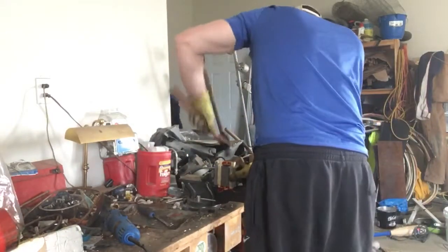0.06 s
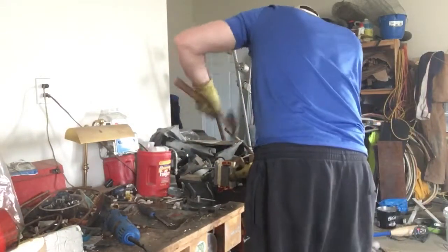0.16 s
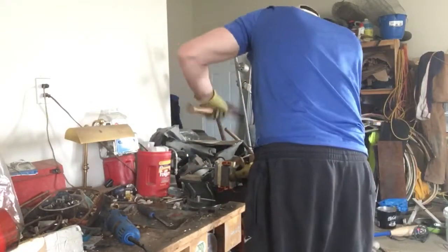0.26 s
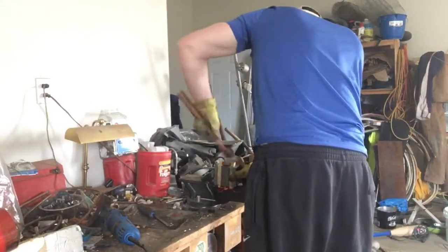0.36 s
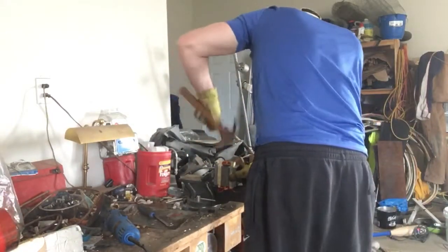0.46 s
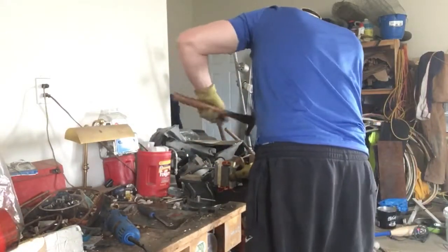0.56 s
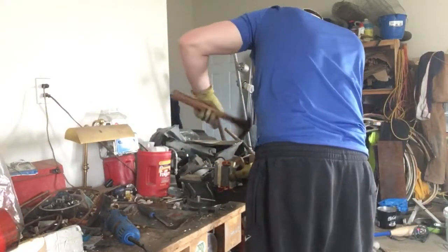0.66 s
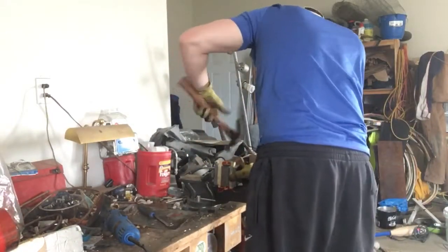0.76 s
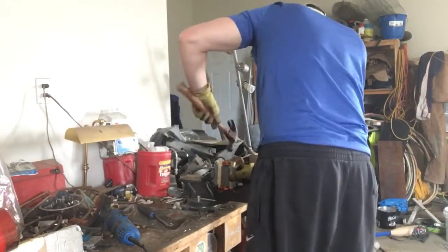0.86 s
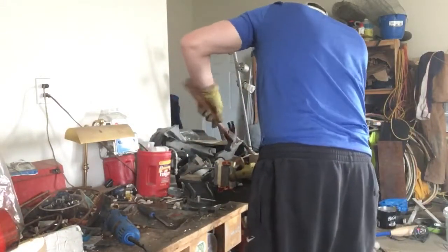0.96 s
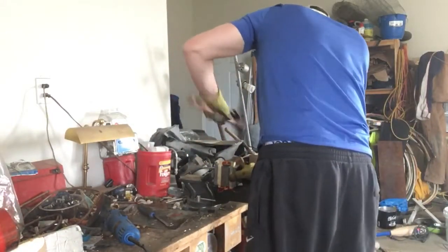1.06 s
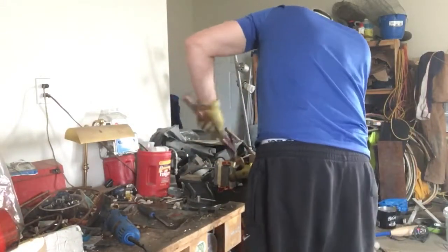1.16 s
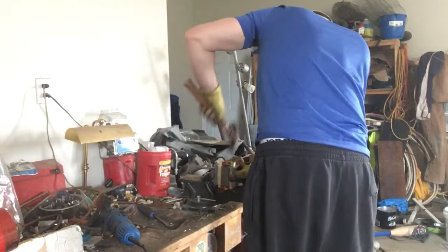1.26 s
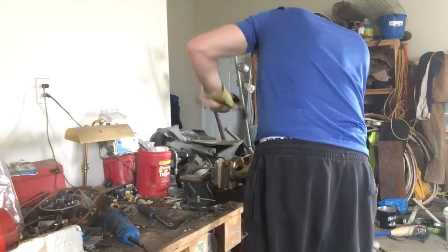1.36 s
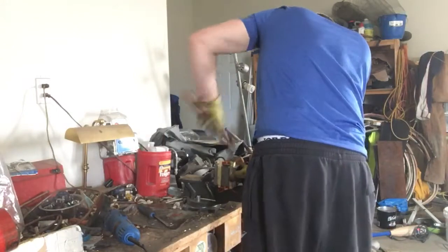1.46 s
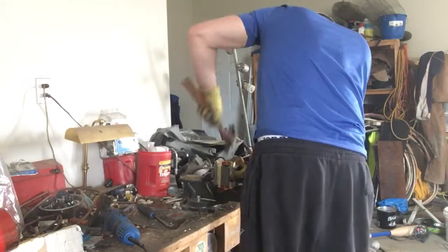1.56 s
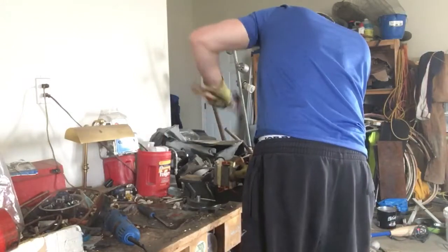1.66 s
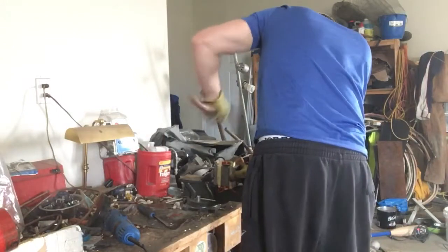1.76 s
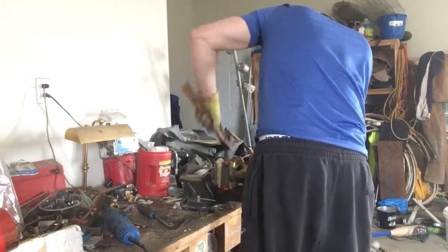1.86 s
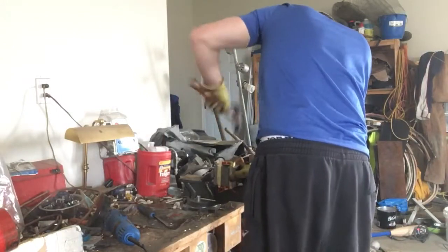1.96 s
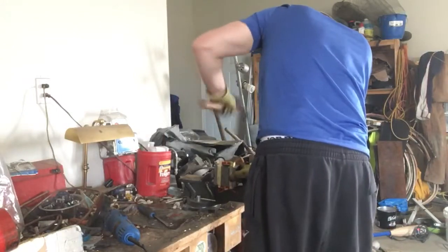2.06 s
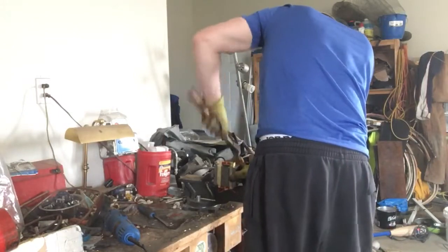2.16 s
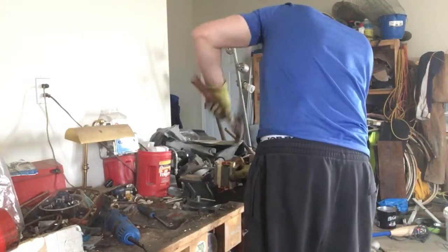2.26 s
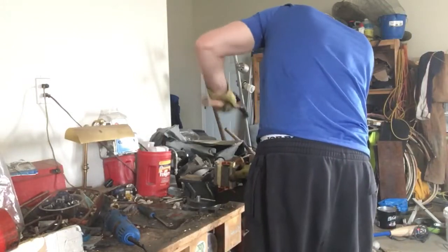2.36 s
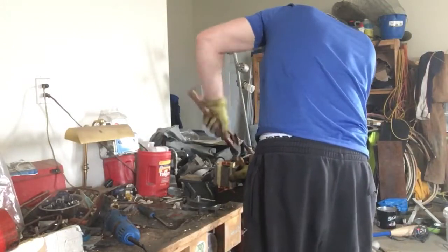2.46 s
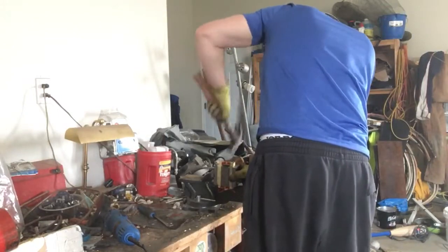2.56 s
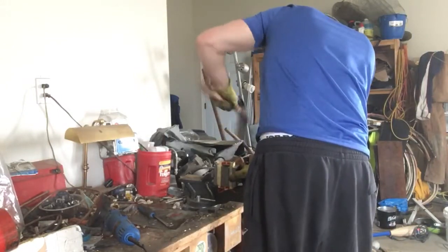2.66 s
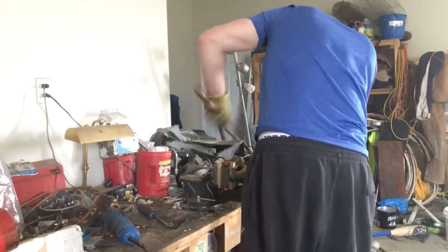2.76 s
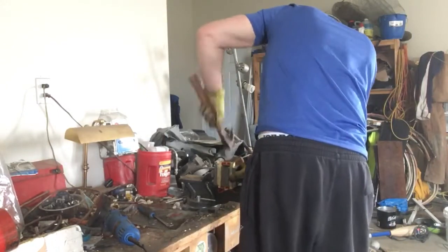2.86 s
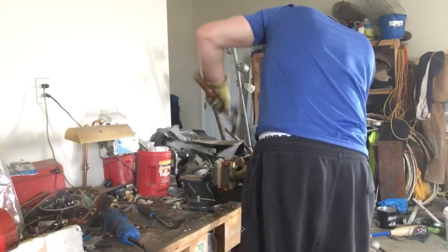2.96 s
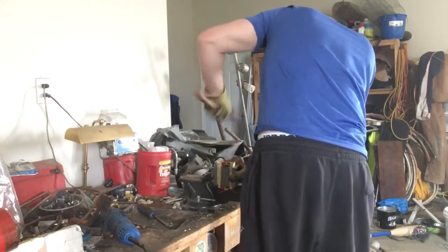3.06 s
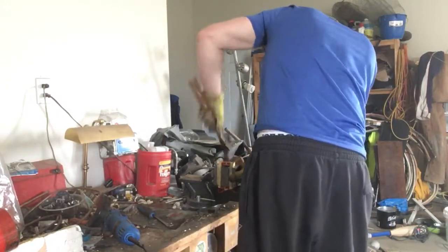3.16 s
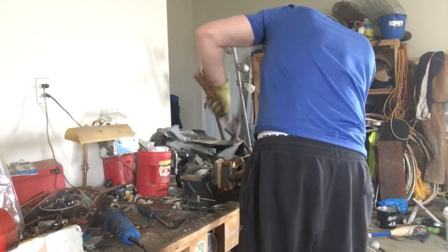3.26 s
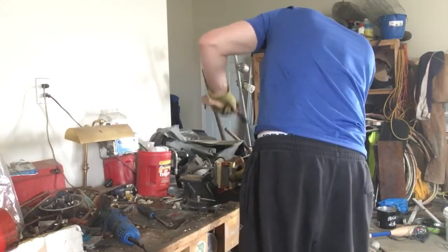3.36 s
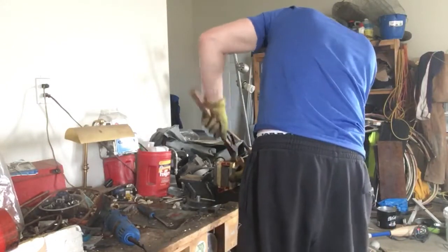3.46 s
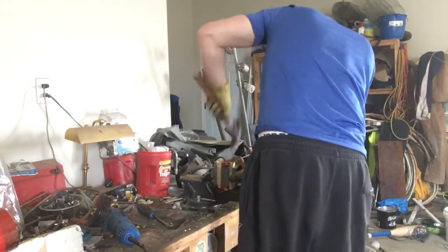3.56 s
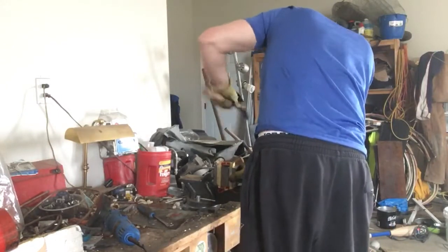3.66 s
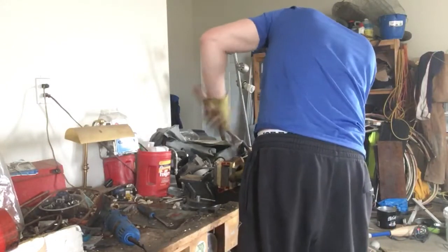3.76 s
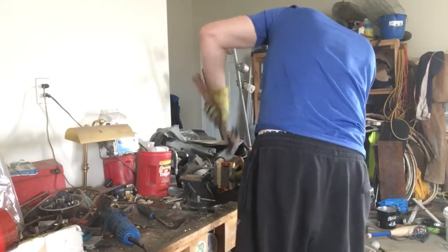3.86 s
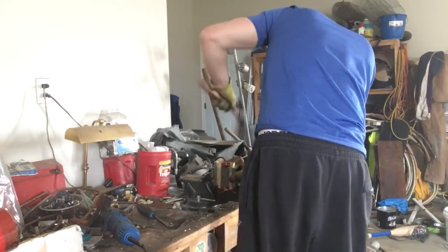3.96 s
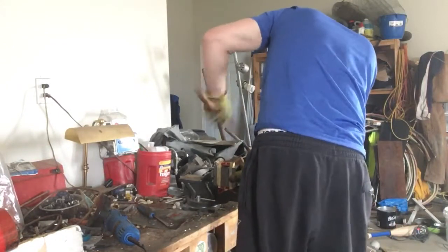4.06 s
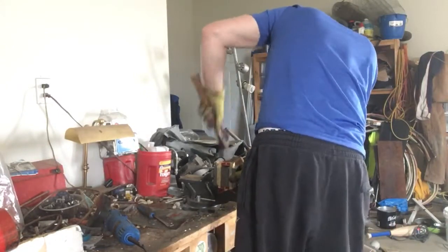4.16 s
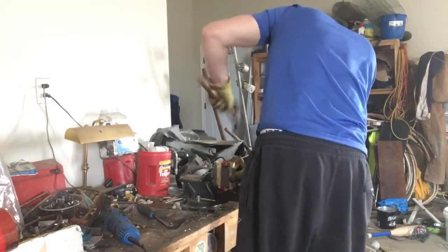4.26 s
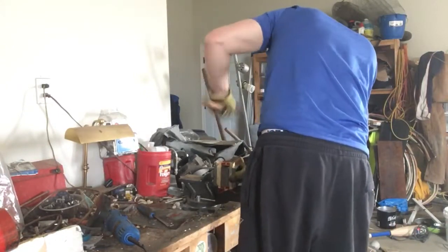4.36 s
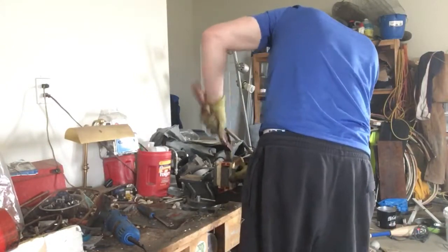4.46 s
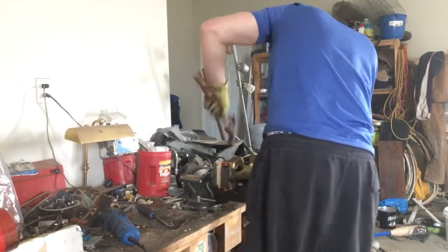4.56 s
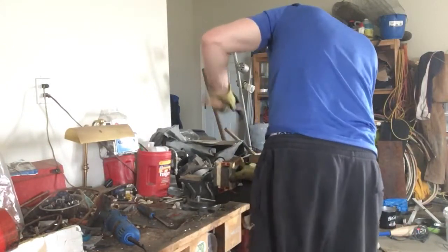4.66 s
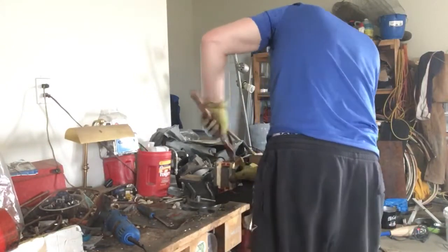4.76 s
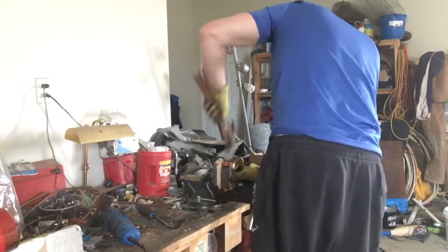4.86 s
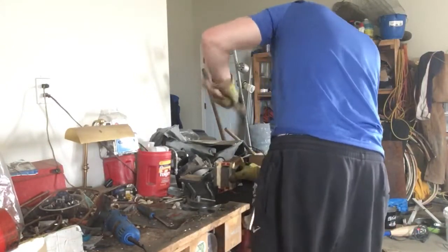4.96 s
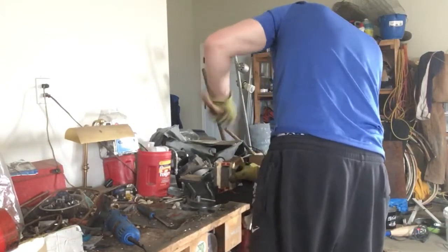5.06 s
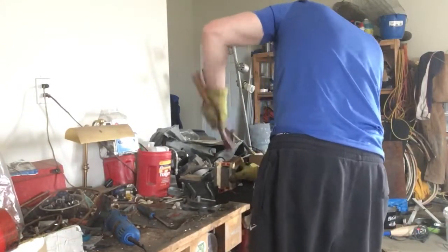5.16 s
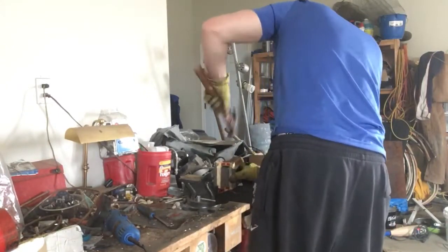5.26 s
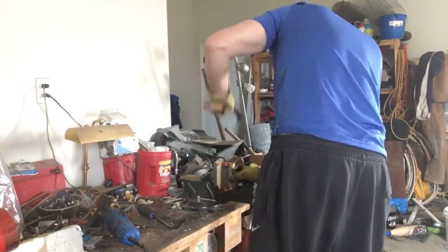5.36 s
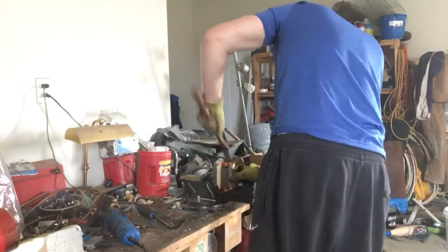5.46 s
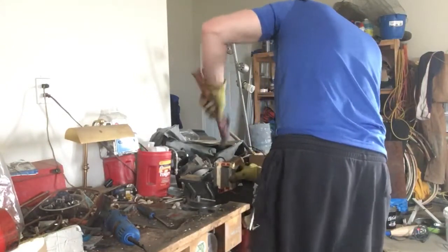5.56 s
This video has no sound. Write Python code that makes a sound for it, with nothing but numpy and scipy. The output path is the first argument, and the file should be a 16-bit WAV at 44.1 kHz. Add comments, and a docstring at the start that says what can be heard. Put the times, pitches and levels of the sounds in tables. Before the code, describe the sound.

Sharp, ringing hammer blows on clamped steel, two at first and then a steady run, with workbench thumps and garage echo.

```python
"""A hammer strikes a steel part in a bench vise, a few steps away in a hard-walled garage.
The scene opens in the echo of a blow, over faint hiss and rumble. Two blows follow, a pause in which
loose metal ticks, then steady hammering, three blows a second, with one more tick near the end.
Each blow clicks and cracks on contact, rings the hammer head and the part, thumps the wooden bench,
and dies away in about a second of echo."""
import sys
import numpy as np
from scipy import signal
from scipy.fft import rfft, irfft, next_fast_len
from scipy.io import wavfile
from scipy.ndimage import map_coordinates

SR = 44100
rng = np.random.default_rng(int(sys.argv[2]) if len(sys.argv) > 2 else 0)


def unload_audio(sound):
    """Save the sound as a 16-bit wav file, at the path given as the first command line argument."""
    columns = np.transpose(np.atleast_2d(sound))
    # keep every value between -1 and 1, then stretch to whole-number steps
    steps = np.round(np.clip(columns, -1, 1) * 32767)
    wavfile.write(sys.argv[1], SR, steps.astype(np.int16))


N = 246959
AGE_S = np.arange(SR * 3 // 2) / SR  # time since contact


def amp(db):
    """dB to gain."""
    return 10 ** (np.asarray(db) / 20)


def along(points, hz):
    """Curve through (f/Hz, value) points, log frequency axis."""
    f, v = np.transpose(points)
    return np.interp(np.log(hz + 1), np.log(f + 1), v)


def burst(spectrum, t60_curve, colour=((1000, 0),)):
    """Noise normalised in its spectrum, then coloured; each frequency decays at its own rate."""
    hz, t, bins = signal.stft(rng.standard_normal(len(AGE_S)), SR, nperseg=512, noverlap=384)
    gain = amp(along(spectrum, hz))
    gain = gain / np.sqrt(np.mean(gain ** 2)) * amp(along(colour, hz))
    decay = amp(-60 * t / along(t60_curve, hz)[:, None])
    return signal.istft(bins * gain[:, None] * decay, SR, nperseg=512, noverlap=384)[1][:len(AGE_S)]


def ring(modes, scatter_db, rise_s, colour=((1000, 0),)):
    """Damped sines of alternating polarity, levels coloured and randomly scattered."""
    hz, db, t60_s = np.transpose(modes)[:, :, None]
    db = db + along(colour, hz) + scatter_db * rng.standard_normal(hz.shape)
    polarity = (-1) ** np.arange(len(hz))[:, None]
    envelope = amp(db - 60 * AGE_S / t60_s) * (1 - np.exp(-AGE_S / rise_s))
    return (polarity * envelope * np.sin(2 * np.pi * hz * AGE_S)).sum(0)


# Idle garage spectrum: f/Hz, level/dB
IDLE_SPECTRUM = [(18, -21.5), (30, 6), (91, -5.5), (314, -10.5), (608, -22.5), (1660, -19.5), (4770, -28),
                 (14800, -34.5), (16500, -13)]

def idle_garage(rms_db=-61.5):
    """Steady hiss and rumble."""
    size = next_fast_len(N)
    gain = amp(along(IDLE_SPECTRUM, np.fft.rfftfreq(size, 1 / SR)))
    noise = irfft(rfft(rng.standard_normal(size)) * gain, size)[:N]
    return amp(rms_db) * noise / noise.std()


# Loose metal ticks: t/s, level/dB
TICKS = [(.9155, -56), (4.751, -58)]

def loose_metal(t60_s=0.004):
    """A bit of metal settles with tiny bright clicks."""
    out = np.zeros(N + len(AGE_S))
    for start_s, db in TICKS:
        bright_noise = np.diff(rng.standard_normal(len(AGE_S) + 1))
        out[round(start_s * SR):][:len(AGE_S)] += amp(db - 60 * AGE_S / t60_s) * bright_noise
    return out[:N]


# Garage echo spectrum: f/Hz, level/dB
ECHO_SPECTRUM = [(30, -37), (60, 6), (170, 6.5), (340, 7), (600, -7), (930, -10), (1290, -5.5), (1540, 1),
                 (1840, 3), (2500, -7), (2900, -6), (7400, -20.5), (14800, -24.5), (16500, -57.5)]
# Garage decay: f/Hz, t60/s
GARAGE_T60 = [(60, 0.87), (130, 0.17), (350, 1), (900, 1), (1650, 0.95), (2300, 0.95), (6400, 0.88),
              (10000, 0.49), (15000, 0.41)]

def garage_echo(colour):
    """Echo builds as wall after wall answers. Returns the blow's echo and a room impulse response."""
    echo = amp(-11.5) * burst(ECHO_SPECTRUM, GARAGE_T60, colour) * (1 - np.exp(-AGE_S / 0.0014))
    room_ir = burst([(1000, 0)], GARAGE_T60) * (1 - np.exp(-AGE_S / 0.0073))
    return echo, room_ir


def echoed(dry, room_ir, wet_db):
    """A ring plus its smeared return from the walls, at wet_db relative energy."""
    wet = signal.fftconvolve(dry, room_ir)[:len(dry)]
    return dry + amp(wet_db) * wet * np.linalg.norm(dry) / np.linalg.norm(wet)


# Near-surface reflections: delay/s, level/dB
WALLS = [(.004, 1), (.0085, -2.5), (0.0118, 1.5), (0.016, -4.5), (.026, -1)]

def reflected(dry, walls_db):
    """A sound plus its delayed copies off near surfaces."""
    return dry + sum(amp(db + walls_db) * np.pad(dry, (round(delay_s * SR), 0))[:len(dry)]
                     for delay_s, db in WALLS)


# Bench and garage air modes: f/Hz, level/dB, t60/s
BENCH_MODES = [(68, -7, .45), (99, -6, .35), (120, -4, .35), (151, 0, .4), (172, 0, .36), (203, -2, .35),
               (227, -6, .4), (246, -6, .4), (270, -3, .45), (281, -4, .45), (314, -3, .5), (329, -1, .55),
               (345, -6, .55), (361, -8, .5), (388, -4, .5), (400, -3, .55), (522, -10, .4), (551, -11, .4),
               (606, -12, .3), (645, -10, .3)]
# Bench top flexure: f/Hz, level/dB, t60/s
FLEX_MODES = [(168, -10, 0.0047), (336, -4.5, 0.036)]

def bench_thump(colour):
    """Bench and air boom; the top flexes under the vise and its push returns off floor and walls."""
    boom = amp(-18.5) * ring(BENCH_MODES, scatter_db=2.5, rise_s=0.0032, colour=colour)
    push = ring(FLEX_MODES, scatter_db=4, rise_s=0.01, colour=colour)
    return boom + reflected(push, walls_db=13)


# Clamped part modes: f/Hz, level/dB, t60/s
PART_MODES = [(1098, -9, .25), (1376, -10, .3), (1515, 1, .35), (1646, 2, .15), (1686, 1, .25),
              (1755, 3, .2), (1840, -3, .2), (1886, -1, .3), (2100, -7, .25), (2152, -10, .25),
              (2850, -4, .15), (2900, -6, .2)]

def part_ring(colour, thump_db, room_ir):
    """The steel part rings; what goes into the bench is lost to its ring."""
    tones = ring(PART_MODES, scatter_db=3.5, rise_s=0.0011, colour=colour)
    return amp(-25 - 0.19 * thump_db) * echoed(tones, room_ir, wet_db=2.5)


def swing_gain(free_s, depth_db=2.5, rate_hz=18, choke_s=0.02):
    """The head's ring wavers as it turns in the air; the next contact chokes it."""
    waver = map_coordinates(rng.standard_normal(2 * rate_hz + 4), [AGE_S * rate_hz])
    onset = 1 - np.exp(-AGE_S * rate_hz)
    choke = np.exp(-np.maximum(AGE_S - free_s, 0) / choke_s)
    return amp(depth_db * waver * onset) * choke


# Hammer head modes: f/Hz
HEAD_HZ = [4355, 5312, 8360, 13400]
# Per head mode: level/dB, t60/s, rise/s, echo level/dB
HEAD_MODES = [(-3.5, 0.047, 0.00086, -7), (-25, 1.1, 0.12, -9), (-16.5, 0.049, 0.00086, 2.5),
              (-29, 0.052, .001, 0.3)]

def head_ring(free_s, room_ir, pair_db, middle_db, top_db):
    """Four head modes ring; the second of the low pair answers more steeply to the hit."""
    drives_db = [pair_db, 1.8 * pair_db, middle_db, top_db]
    out = np.zeros(len(AGE_S))
    for hz, (db, t60_s, rise_s, wet_db), drive_db in zip(HEAD_HZ, HEAD_MODES, drives_db):
        tone = swing_gain(free_s) * ring([(hz, db + drive_db, t60_s)], scatter_db=-1.5, rise_s=rise_s)
        out += echoed(tone, room_ir, wet_db)
    return out


# Steel-on-steel click spectrum: f/Hz, level/dB
CLICK_SPECTRUM = [(300, -13.5), (1500, 9), (3000, 1.5), (7000, -5.5), (13000, -9.5), (16500, -13)]

def steel_click(click_db, t60_s=0.0047):
    """Steel meets steel: milliseconds of bright noise, with early reflections."""
    envelope = amp(click_db - 1 - 60 * AGE_S / t60_s)
    return reflected(envelope * burst(CLICK_SPECTRUM, [(1000, 0.93)]), walls_db=-6)


# First-contact spectrum: f/Hz, level/dB
CRACK_SPECTRUM = [(200, -31), (450, -2.5), (930, -8.5), (1900, 4.5), (2500, -3.5), (2920, -5),
                  (5170, -12.5), (10000, -28), (14000, -42), (16500, -43)]
# Crack decay: f/Hz, t60/s
CRACK_T60 = [(300, 0.3), (2000, 0.044), (6000, 0.11), (14000, 0.025)]

def contact_crack(colour):
    """Broadband crack of first contact; the lows last longest."""
    return amp(-4.5) * burst(CRACK_SPECTRUM, CRACK_T60, colour)


# Blow colour: f/Hz, base level/dB, thump slope/(dB/dB), glance slope/(dB/dB)
BLOW_COLOUR = [(81, -1, 0.22, 0.14), (148, -4, 1.25, 0.46), (350, -6.5, -0.17, -0.78),
               (730, 1.5, 0.38, 0.02), (1610, -8, 0.14, -0.1), (2080, -7, 0.09, .05),
               (3900, -4, 0.23, 0.48), (11200, -2.45, 0.53, 0.88)]

def blow(free_s, thump_db, glance_db, click_db, *head_db):
    """One blow with its echo: a square hit drives more bass into the bench, a glancing one is brighter."""
    colour = [(hz, db + per_thump * thump_db + per_glance * glance_db)
              for hz, db, per_thump, per_glance in BLOW_COLOUR]
    contact = steel_click(click_db) + contact_crack(colour)
    echo, room_ir = garage_echo(colour)
    steel = head_ring(free_s, room_ir, *head_db) + part_ring(colour, thump_db, room_ir)
    return contact + echo + steel + bench_thump(colour)


# Hammer blows: t/s, level/dB, thump/dB, glance/dB, click/dB, head low pair/dB, middle/dB, top/dB
BLOWS = [(-0.27, -10.5, 2, -1, -0.5, -5, -10, -8), (0.0614, -11, 11.5, -4, -2, -21, -0.5, 3),
         (0.3714, -11.5, -10, 14, 1.5, -13.5, -32, -12), (1.2034, -10, 2, 4.5, -4.5, -2, -5.5, -16),
         (1.5102, -8.5, 7.5, 0, 2.4, -15, -6.5, -14.5), (1.841, -5.5, 2.5, -0.4, -4.5, -13.5, -9, -10),
         (2.17, -8, 3.8, 2.5, -7.5, 0.3, -0.5, -8), (2.4944, -4.5, -6.5, 6.5, -4.5, -11, -14, -13),
         (2.828, -5.5, -2.5, 0.8, -4, -28, -16, -10), (3.1549, -6.5, 6, -4.5, -4.5, -31, -15, -13.0),
         (3.484, -7, 3, 1.5, -13, -16, -6.5, 1), (3.8161, -7, 1.2, 0.5, -3.5, -17, -16, -18),
         (4.139, -4, -1, 2.8, -8, -29, -17, -10), (4.4659, -5, 2.1, -2, -6.5, -4, -9, 2),
         (4.799, -7.5, 4.5, -3, -16, -7, -8, -9), (5.1392, -5, -1, 0, -4.5, -20, -14, -15),
         (5.48, -5.5, 2.8, -4, -4, -16, -5, 4)]

def hammering():
    """Blows in sequence; the head rings freely from each to the next."""
    out = np.zeros(N + 3 * SR)  # 1 s lead-in for the blow before t = 0
    gaps_s = np.diff([row[0] for row in BLOWS], append=N / SR)
    for (start_s, db, *touch_db), free_s in zip(BLOWS, gaps_s):
        out[SR + round(start_s * SR):][:len(AGE_S)] += amp(db) * blow(free_s, *touch_db)
    return out[SR:SR + N]


def scene():
    """Mono sum at the microphone."""
    return (hammering() + loose_metal() + idle_garage())[None]


def record(dry, ceiling=0.75, bass_hz=55, shelf_hz=15900, cutoff_hz=16830):
    """The input stage rounds off peaks; deepest bass and the very top are lost."""
    limited = dry / (1 + np.abs(dry / ceiling) ** 4) ** (1 / 4)
    size = next_fast_len(N + SR)
    hz = np.fft.rfftfreq(size, 1 / SR)
    highpass = (1j * hz / (bass_hz + 1j * hz)) ** 4
    lowpass = np.where(hz < shelf_hz, 1, amp(-21)) * (hz < cutoff_hz)
    return irfft(rfft(limited, size) * highpass * lowpass, size)[:, :N]


dry = scene()
out = record(dry)
unload_audio(out)
```